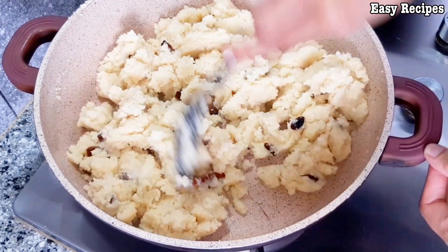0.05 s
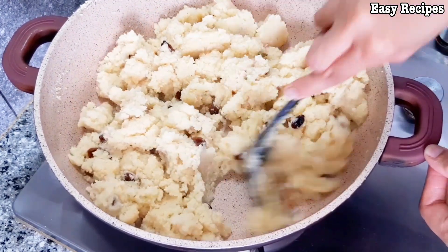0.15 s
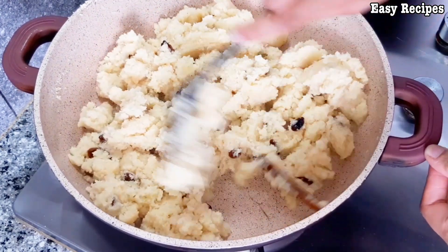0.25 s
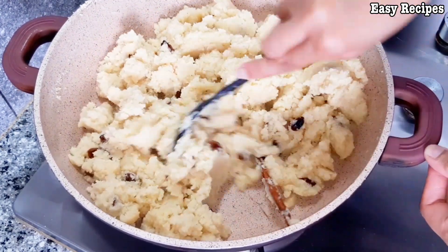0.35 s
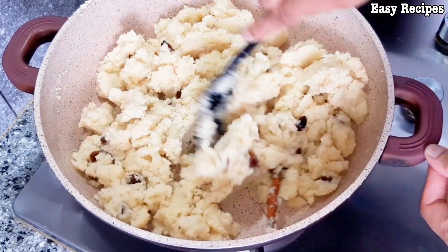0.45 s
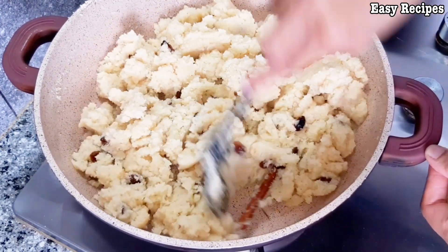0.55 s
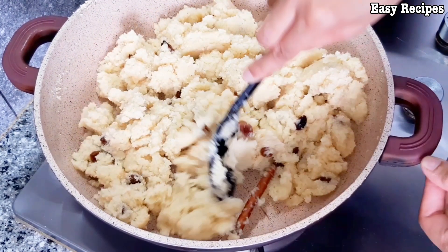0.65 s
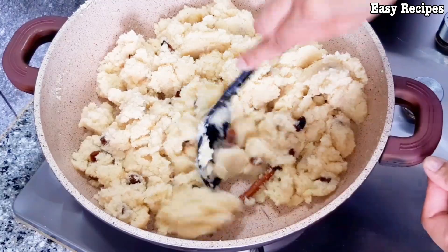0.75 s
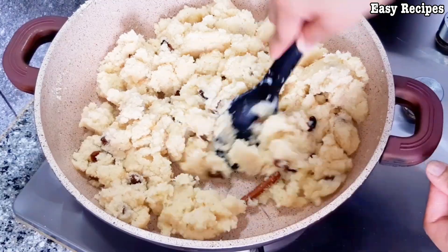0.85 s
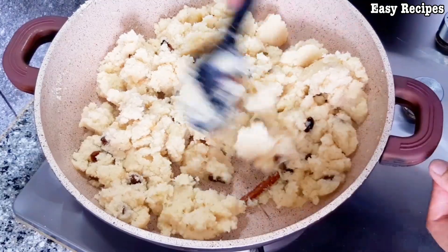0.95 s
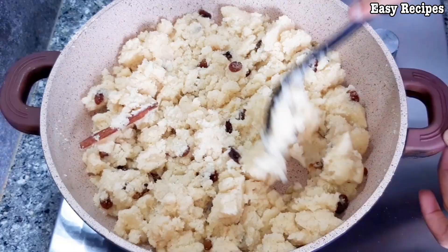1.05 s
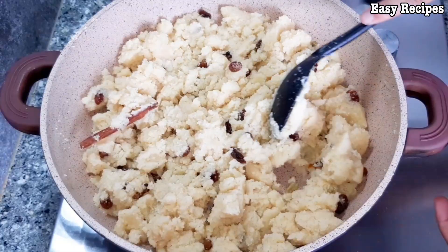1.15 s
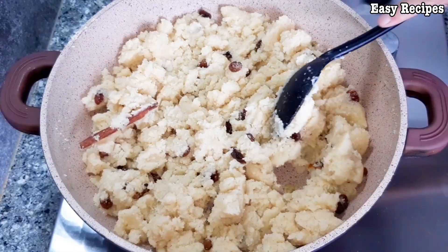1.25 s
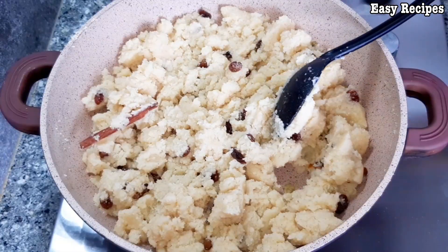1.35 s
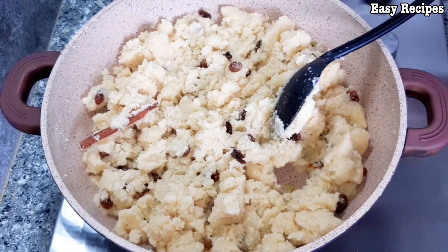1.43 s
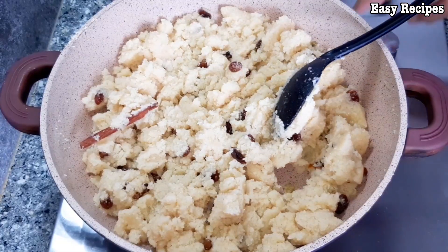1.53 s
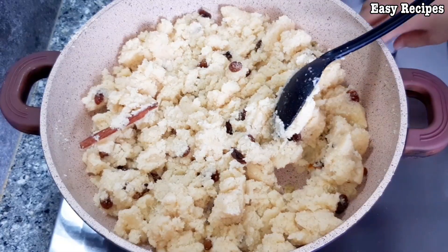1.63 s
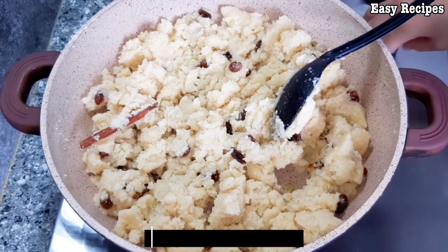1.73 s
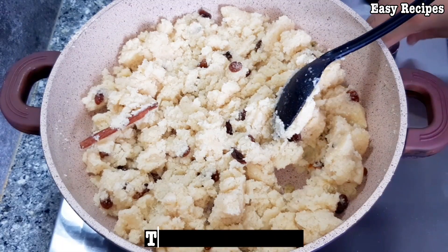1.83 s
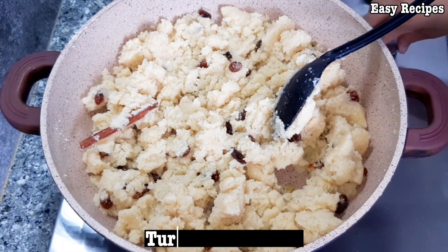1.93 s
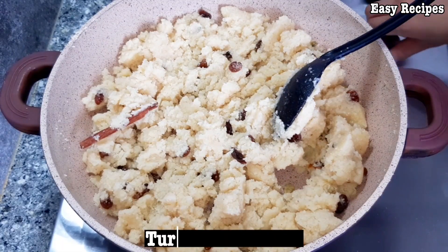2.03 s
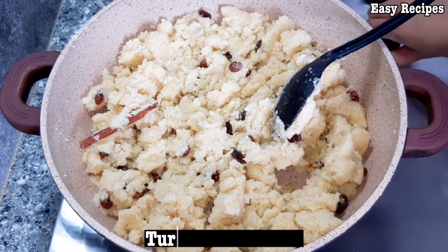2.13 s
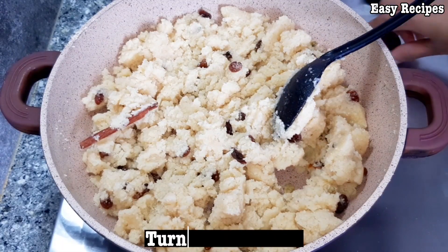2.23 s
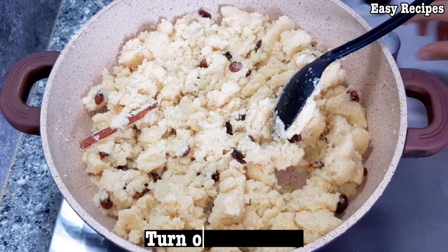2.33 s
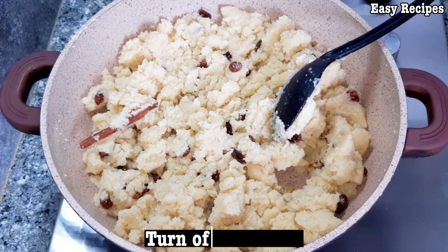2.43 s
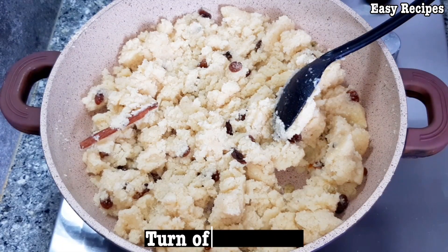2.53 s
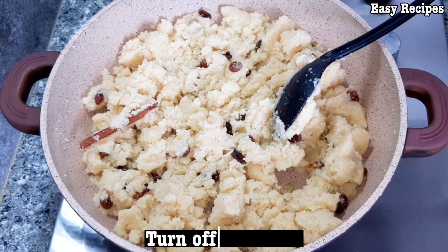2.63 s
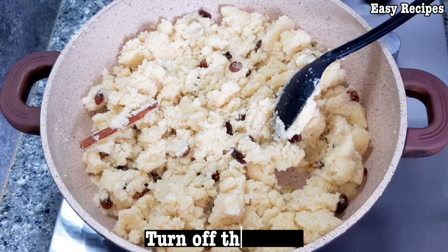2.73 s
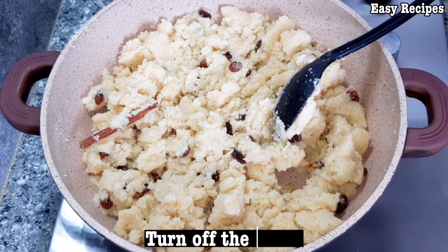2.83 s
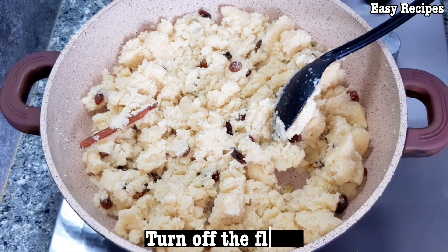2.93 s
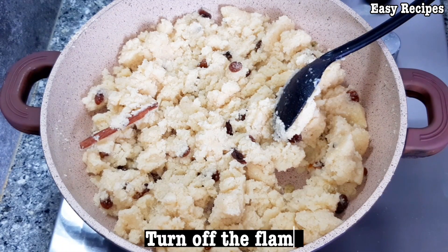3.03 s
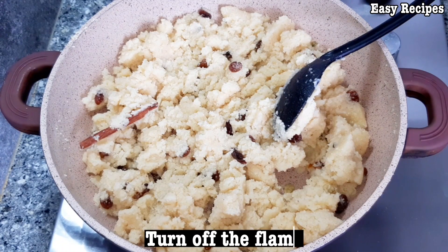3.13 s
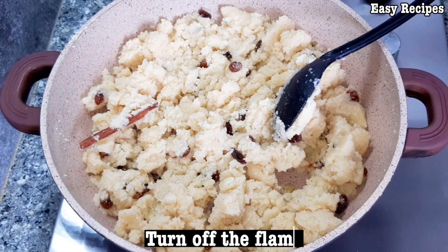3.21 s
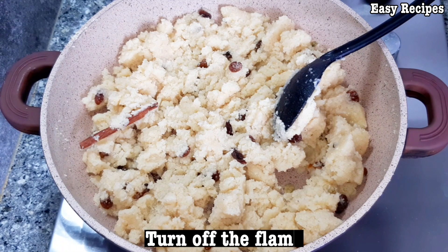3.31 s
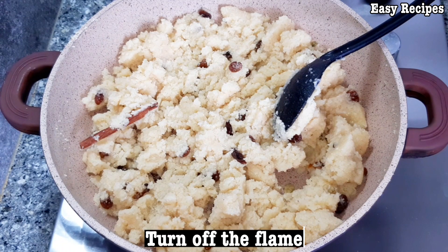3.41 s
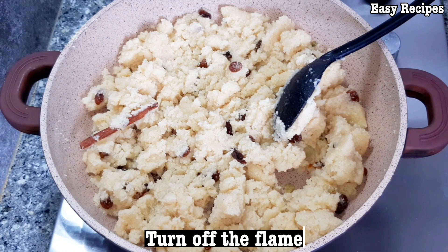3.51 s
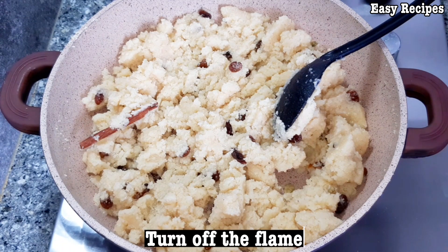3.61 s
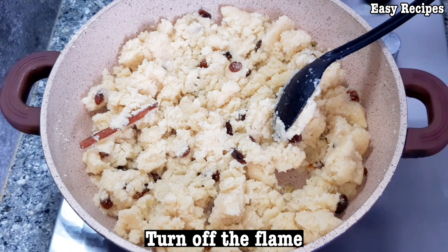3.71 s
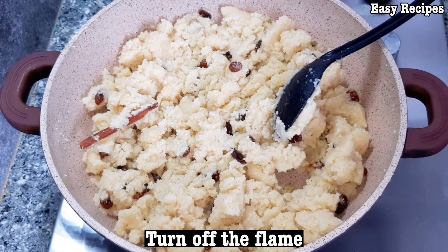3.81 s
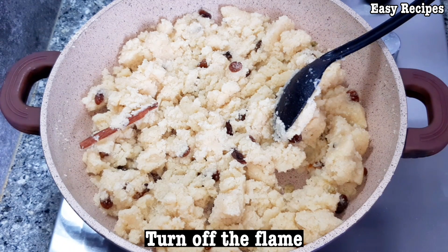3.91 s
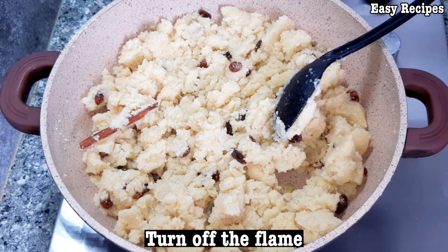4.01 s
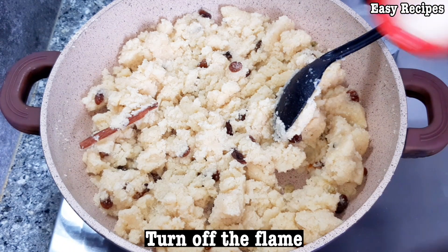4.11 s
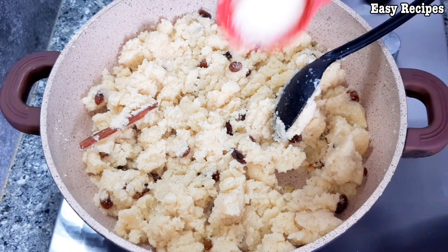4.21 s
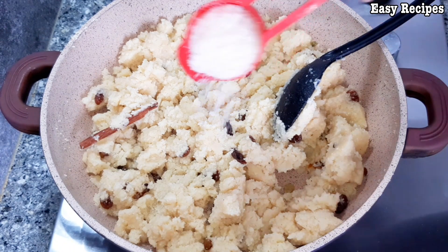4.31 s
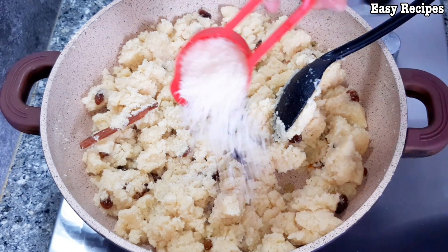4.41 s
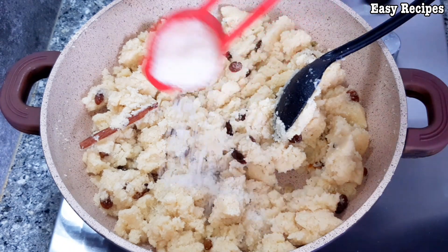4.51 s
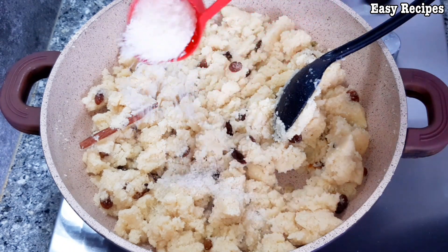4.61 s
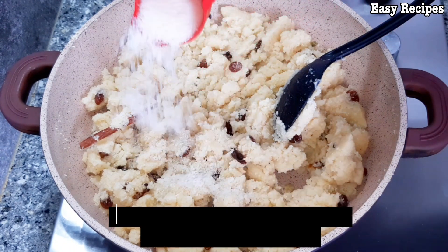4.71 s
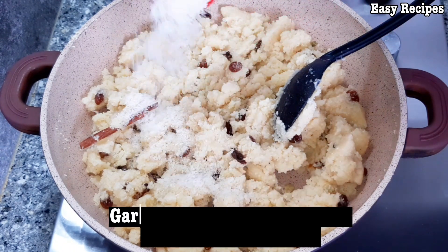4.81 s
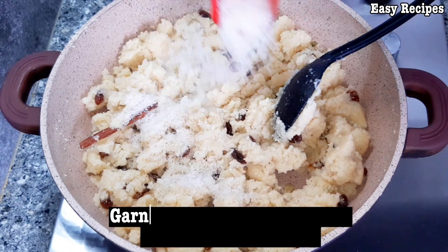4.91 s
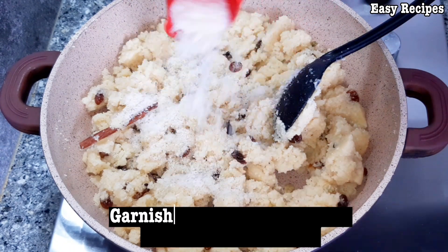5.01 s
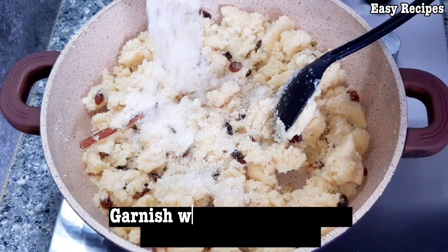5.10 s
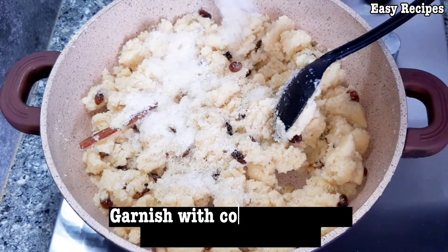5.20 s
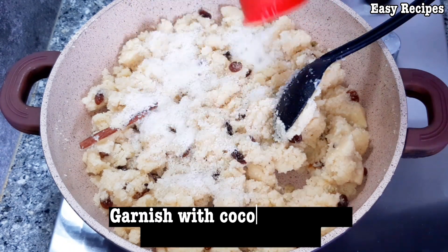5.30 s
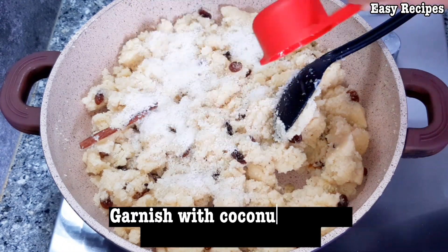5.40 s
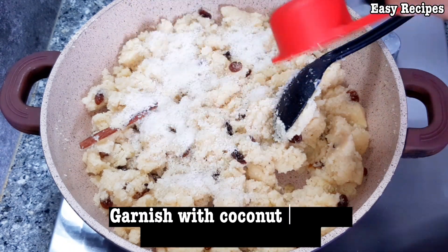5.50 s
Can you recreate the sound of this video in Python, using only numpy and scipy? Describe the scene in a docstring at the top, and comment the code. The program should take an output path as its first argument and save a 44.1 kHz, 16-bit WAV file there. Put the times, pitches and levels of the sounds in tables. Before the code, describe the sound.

In a small kitchen, close stereo microphones catch wet dough sizzling as a plastic spatula knocks and scrapes softly in a pot. After about a second the sizzle cuts off, leaving a low fluttering gas flame. A knob snaps with a double click, the flame dies with a deep thump, and faint hiss remains with tiny crackles, dull bumps and finally a rattling utensil further off.

```python
"""A plastic spatula turns thick, sizzling dough in a pot on a gas burner, knocking softly against the metal.
The loud sizzle stops abruptly, the flame flutters under the pot, the gas knob clicks and the flame goes out
with a thump. The pot crackles faintly, soft bumps follow, and a utensil clatters further off in the small kitchen.
Hisses, knocks and flame are noise filtered by colours and resonances; the flame's throb is a train of air pulses,
and its moan and the ringing gap under the pot are sines."""
import sys
import numpy as np
from scipy import signal
from scipy.fft import rfft, irfft
from scipy.io import wavfile
from scipy.ndimage import uniform_filter1d

SR = 44100
rng = np.random.default_rng(int(sys.argv[2]) if len(sys.argv) > 2 else 0)


def wrap_up_sound(samples):
    """Save the sound to the file named by the first command line argument, as 16-bit audio."""
    columns = np.atleast_2d(samples).T
    # keep every value between -1 and 1, then stretch to whole-number steps
    tamed = np.clip(columns, -1, 1)
    steps = np.round(tamed * 32767).astype(np.int16)
    wavfile.write(sys.argv[1], SR, steps)


N = 244755
TIME = np.arange(N) / SR  # s
FREQ = np.maximum(np.arange(N // 2 + 1) * SR / N, 1)  # Hz

# colour of the frying: (frequency [Hz], relative level [dB])
FRYING_COLOUR = [(200, -16), (600, -4.5), (1400, -3.5), (2500, 0.5), (6500, -1.5), (8300, -8), (12500, -2),
                 (15500, -4)]
# sweeps of the blade that make the frying surge: (start [s], length [s], level [dB])
SWEEPS = [(0, 0.13, -45.5), (0.188, 0.074, -44), (0.352, .13, -46.5), (0.658, 0.034, -44),
          (0.853, 0.2, -46.5)]
# colour of the quiet kitchen: (frequency [Hz], relative level [dB])
AIR_COLOUR = [(30, -26.5), (100, -13.5), (160, -8), (320, -1.5), (430, -8.5), (550, -1.5), (850, -2.5),
              (1250, -7.5), (2200, -5), (6500, -5), (8500, -12.5), (12500, -6), (15500, -9)]
# colour of the gas jet: (frequency [Hz], relative level [dB])
JET_COLOUR = [(300, -8.5), (1200, -0.5), (2500, 0.5), (6000, 0), (8500, -6.5), (12500, -1.5), (15500, -3.5)]
# resonances of the air gap between burner and pot:
# (frequency [Hz], width [Hz], relative level in the flame [dB], relative level ringing after the thump [dB])
AIR_GAP = [(98.4, 28, 4.5, 2.5), (202.3, 12, 1.5, -1.5), (228.2, 21, -2.5, -2), (301.5, 32, -2.5, -4.5),
           (394, 98, -16.5, -6.5), (568.5, 56, -16, -9.5), (805, 55, -29, -13.5), (980, 66, -27.5, -17.5)]
# flares and gulps of the flame: (time [s], level [dB], half length [s])
FLARES = [(1.136, -45, 0.027), (1.414, -49.5, 0.094), (1.93, -51, 0.13), (2.229, -43, 0.037),
          (2.378, -45.5, 0.021), (2.513, -49, 0.024)]
# spatula strokes: (time [s], level before gain [dB], build-up [s], brightness [Hz], relative scrape level [dB])
STROKES = [(.214, -31, 0.0088, 2000, -17), (.236, -47, 0.0033, 2500, -6), (.365, -52.5, .012, 2000, -13),
           (0.438, -37, .0069, 1800, -14), (.448, -32, 0.0024, 1190, -19), (.461, -35.5, 0.0026, 700, -34),
           (.67, -38, 0.0085, 500, -4.5), (.685, -38, .0035, 170, -22), (0.911, -53.5, 0.03, 200, -4)]
# resonances of the pot, damped by the dough: (frequency [Hz], width [Hz], relative level [dB])
POT_RESONANCES = [(115, 20, 8), (274, 78, 5), (583, 105, 4), (700, 68, -1), (804, 59, 7), (1040, 36, -32),
                  (1450, 120, -8), (1760, 90, -7), (2380, 170, -4.5), (4000, 69, -1)]
# steam blisters bursting in the dough: (time [s], level before gain [dB])
BLISTERS = [(1.1395, -51), (1.5514, -44.5), (1.7979, -49), (3.337, -50), (4.073, -50.5), (4.1562, -48),
            (5.3229, -56)]
# clicks of the gas knob snapping shut: (time [s], level before gain [dB])
KNOB_CLICKS = [(2.1473, -36.5), (2.1511, -30.5)]
# colour of the knob's snap: (frequency [Hz], relative level [dB])
KNOB_COLOUR = [(200, -32), (1200, -2.5), (2700, -1), (5000, -1.5), (5820, 8.5), (6600, -3), (8000, -7.5),
               (14000, -3), (15500, -8.5)]
# resonances of the stove housing behind the knob: (frequency [Hz], width [Hz], relative level [dB])
STOVE_HOUSING = [(320, 39, 3), (467, 45, 4.5), (554, 45, 4), (635, 45, 5), (739, 70, -8)]
# colour of the air rushing as the flame collapses: (frequency [Hz], relative level [dB])
RUSH_COLOUR = [(25, -7), (60, -6), (100, -11.5), (160, -9.5), (300, -1.5), (430, -5), (560, -3.5),
               (720, -9.5), (900, -6), (1250, -19.5), (1900, -23), (3000, -35.5), (7000, -47), (14000, -52)]
# soft bumps and shuffles around the stove: (time [s], level [dB], length [s], pitch [Hz])
BUMPS = [(3.346, -61, .025, 105.5), (4.14, -63.5, 0.063, 442), (4.446, -62.5, 0.044, 106),
         (5.266, -63, 0.089, 104.8)]
# knocks of the utensil: (start [s], level before gain [dB], ring [s], brightness [Hz])
CLATTER = [(4.773, -53.5, 0.036, 1300), (4.9644, -29.5, .012, 14000), (4.984, -39.5, 0.032, 4500),
           (5.019, -37, 0.025, 4600), (5.128, -39, 0.015, 5900), (5.153, -43, 0.025, 4000)]
# resonances of the utensil: (frequency [Hz], width [Hz], relative level [dB])
UTENSIL_RESONANCES = [(320, 290, 0.5), (586, 80, 3), (838, 230, 3.5), (1300, 690, 0.5), (1685, 280, 7),
                      (2050, 320, 1.5), (2780, 400, 6), (3230, 240, 1.5), (4560, 1400, -0.5),
                      (6100, 540, -3), (9400, 2700, -3.5), (12000, 1800, 0.5)]
# kitchen reverberation: (frequency [Hz], time to fall by 60 dB [s])
ROOM_DECAY = [(100, 0.385), (400, 0.14), (1200, 0.29), (4000, 0.2), (12000, 0.23)]
# how alike the two microphones hear: (frequency [Hz], correlation [0 to 1])
MIC_LIKENESS = [(110, 0.92), (260, 0.51), (550, 0.25), (1100, 0)]
# colour difference of the microphones: (frequency [Hz], left minus right [dB])
MIC_DIFFERENCE = [(100, 0), (380, -2.34), (1200, -2), (4400, -.5), (6500, -0.5), (8500, 10), (15000, 2)]

SIZZLE_END_S, FLAME_OUT_S = 1.085, 2.5755
FRYING_DB, SURGE_RISE_S, SURGE_FALL_S = -49.5, 0.022, 0.12  # frying between sweeps; how a surge comes and goes
AIR_DB, JET_DB = -56.5, -57  # steady hiss of the kitchen and of the gas jet
JET_EMPTY_S, JET_FADE_S = 2.68, 0.1  # the gas line has emptied; how fast its hiss then fades
# drone of the flame before its flutter: under the sizzle, after the sizzle, with the gas shut off
FLAME_EARLY_DB, FLAME_STEADY_DB, FLAME_STARVED_DB = -56, -51, -55.5
THROB_HZ, DYING_THROB_HZ = 150, 105  # before and after the collapse
STROKE_FALL_S, STROKE_LOW_HZ = 0.0082, 226  # die-away; low edge of a stroke with a brightness of 1 kHz
CLATTER_LOW_HZ, CLATTER_RISE_S = 358, 0.0043  # low edge and build-up of every utensil knock
TOP_HZ = 15650  # where the treble is cut


def undb(db):
    """Decibels to gain."""
    return 10 ** (np.asarray(db) / 20)


def unit(x):
    """Scale to rms 1."""
    return x / np.sqrt(np.mean(x ** 2))


def across(points, hz=FREQ):
    """Read (Hz, value) points on a log-frequency axis."""
    point_hz, value = np.transpose(points)
    return np.interp(np.log(hz), np.log(point_hz), value)


def shape(x, gain):
    """Filter by a gain for each frequency."""
    return irfft(rfft(x) * gain, N)


def band(low_hz, high_hz):
    """Response that falls 12 dB an octave outside two edges."""
    return 1 / np.sqrt((1 + (low_hz / FREQ) ** 4) * (1 + (FREQ / high_hz) ** 4))


def causal(points):
    """Response with the given (Hz, dB) colour that rings only after a blow."""
    cepstrum = irfft(np.log(undb(across(points))), N)
    # fold the backward half onto the forward half: minimum phase
    cepstrum[1:N // 2] *= 2
    cepstrum[N // 2:] = 0
    return np.exp(rfft(cepstrum))


def resonances(modes):
    """Response of (Hz, width, dB) resonances side by side."""
    return sum(undb(db) / (1 + 1j * (FREQ ** 2 - hz ** 2) / (FREQ * width)) for hz, width, db in modes)


def even(response):
    """Scale a response so that white noise keeps its level."""
    return response / np.sqrt(np.mean(np.abs(response) ** 2))


def pair(two):
    """Two unrelated signals as the microphones hear them: alike in the bass, apart in the treble."""
    alike = across(MIC_LIKENESS)
    mid = shape(two[0], np.sqrt((1 + alike) / 2))
    side = shape(two[1], np.sqrt((1 - alike) / 2))
    return np.array([mid + side, mid - side])


def noise():
    """Stereo white noise."""
    return pair(rng.standard_normal((2, N)))


def walk(rate):
    """Slow random wander of rms near 1, with rate new values a second, smoothed twice."""
    step = int(SR / rate)
    stairs = np.repeat(rng.standard_normal(N // step + 1), step)
    return unit(uniform_filter1d(uniform_filter1d(stairs, step), step)[:N])


def swell(s, rise, fall, hold=0):
    """Envelope that grows up to time s, may hold, and dies away."""
    before = np.maximum(s - TIME, 0)
    after = np.maximum(TIME - s - hold, 0)
    return np.exp(-before / rise - after / fall)


def kitchen(x, wet_db):
    """Add the diffuse tail of a small tiled room, each band of noise dying at its own pace."""
    t = TIME[:SR // 2]
    diffuse, tail = noise(), 0
    for k, (_, t60) in enumerate(ROOM_DECAY):
        # full gain at this point of the table, none at the others
        share = across([(hz, j == k) for j, (hz, _) in enumerate(ROOM_DECAY)])
        tail = tail + shape(diffuse, share)[:, :len(t)] * np.exp(-np.log(1000) * t / t60)
    tail = tail * (1 - np.exp(-t / .008))  # the echoes take a moment to gather
    tail = unit(tail) / np.sqrt(len(t))
    return x + undb(wet_db) * signal.fftconvolve(np.atleast_2d(x), tail, axes=1)[:, :N]


def fizz(spread_db):
    """Grainy stereo noise whose short grains vary randomly in strength."""
    size = np.repeat(undb(spread_db * rng.standard_normal(N // 20 + 1)), 20)[:N]
    return unit(noise() * size)


def smooth_hiss(level_db, colour):
    """Smooth hiss of the given colour whose level wavers a little."""
    coloured = unit(shape(fizz(spread_db=1.5), undb(across(colour))))
    return coloured * undb(level_db + .4 * walk(3.28))


def frying():
    """Wet dough hisses on the hot metal, surging with each sweep; at 1.085 s the loud hiss stops abruptly."""
    sizzle = shape(fizz(spread_db=1.5), even(causal(FRYING_COLOUR)))
    surge_power = sum((undb(db) * swell(s, SURGE_RISE_S, SURGE_FALL_S, hold=length)) ** 2
                      for s, length, db in SWEEPS)
    level = np.sqrt(undb(FRYING_DB) ** 2 + surge_power)
    stop = np.clip((SIZZLE_END_S - TIME) / 0.0076, 0, 1)
    return sizzle * level * stop


def quiet_kitchen(rumble_db=-79):
    """Faint even hiss over a low unsteady room rumble, resonant noise near 103 Hz."""
    rumble = unit(shape(noise(), resonances([(103, 45, 0)]) ** 2))
    return smooth_hiss(AIR_DB, AIR_COLOUR) + rumble * undb(rumble_db + 2.5 * walk(7.6))


def gas_jet():
    """Gas hisses through the burner until the line has emptied."""
    flow = np.exp(-np.maximum(TIME - JET_EMPTY_S, 0) / JET_FADE_S)
    return flow * smooth_hiss(JET_DB, JET_COLOUR)


def flame_strength():
    """The flame is louder after the sizzle, starves once the knob shuts, and is gone; flares ride on top."""
    steady = np.select([TIME < SIZZLE_END_S, TIME < KNOB_CLICKS[0][0], TIME < FLAME_OUT_S],
                       undb([FLAME_EARLY_DB, FLAME_STEADY_DB, FLAME_STARVED_DB]))
    steady = uniform_filter1d(steady, size=SR // 50)
    flare_power = sum((undb(db) * np.exp(-((TIME - s) / length) ** 2 / 2)) ** 2 for s, db, length in FLARES)
    return np.sqrt(steady ** 2 + flare_power)


def flame(flutter_db=1.9, moan_db=-8, moan_hz=265, wander=0.11):
    """Turbulent burning drones in the gap under the pot, with a faint moan that wanders in pitch."""
    gap = resonances([(hz, width, db) for hz, width, db, _ in AIR_GAP])
    turbulence = undb(across([(40, -8.0), (90, -2.0), (330, 2.5), (430, -3),
                              (900, -5.5), (2500, -24.0), (8000, -47)]))  # (Hz, dB)
    drone = unit(shape(noise(), gap * turbulence))
    pitch_hz = moan_hz * np.exp(wander * walk(9))
    moan = unit(np.sin(2 * np.pi * np.cumsum(pitch_hz) / SR) * walk(24.91))
    return (drone + undb(moan_db) * moan) * flame_strength() * undb(flutter_db * walk(30))


def spatula(gain_db=3.0):
    """The blade squeezes through dough and drags over the pot; more dough makes a duller, deeper knock."""
    pot, blade = resonances(POT_RESONANCES), even(resonances([(3200, 1200, 0)]))
    strokes = 0
    for s, db, rise, bright_hz, scrape_db in STROKES:
        drag = fizz(spread_db=2.2) * swell(s, rise, STROKE_FALL_S) * undb(db + gain_db)
        low_hz = STROKE_LOW_HZ * np.sqrt(bright_hz / 1000)
        dulling = 1 / (1 + 1j * FREQ / bright_hz)
        knock = even(pot * band(low_hz, 9000) * dulling)
        strokes = strokes + shape(drag, knock + undb(scrape_db) * blade)
    return kitchen(strokes, wet_db=-8.5)


def blisters(gain_db=2):
    """Now and then a blister of steam bursts in the dough: a very short tick of bright noise."""
    bursts = noise() * sum(undb(db + gain_db) * swell(s, 0.00033, .003) for s, db in BLISTERS)
    return kitchen(shape(bursts, band(2500, 19000)), wet_db=-0.5)


def knob(fall=0.0028, gain_db=3, housing_db=-1):
    """The gas knob snaps into its stop with a double click that knocks the stove housing."""
    snap = noise() * sum(undb(db + gain_db) * swell(s, 0.00017, fall) for s, db in KNOB_CLICKS)
    click = even(causal(KNOB_COLOUR))
    housing = undb(housing_db) * even(resonances(STOVE_HOUSING))
    return kitchen(shape(snap, click + housing), wet_db=-6.0)


def flame_out(throb_db=-7, rush_db=-19, ring_db=-27, ring_s=.04):
    """Starved of gas, the flame throbs ever harder, collapses, and rings the gap under the pot."""
    since = TIME - FLAME_OUT_S
    growth = np.minimum(1.7 * swell(FLAME_OUT_S - .0025, .0065, .007), 1)
    # each throb is a short suck of air as the burning gas shrinks; they slow down after the collapse
    cycles = since * np.where(since < 0, THROB_HZ, DYING_THROB_HZ)
    sucks = -np.exp(5.5 * np.cos(2 * np.pi * cycles))
    sucks = shape(sucks * growth, np.abs(resonances([(380, 260, 0)])) * band(180, 1500))
    throb = undb(throb_db) * sucks / np.abs(sucks).max()
    gust = noise() * swell(FLAME_OUT_S + 0.00067, 0.0084, 0.017)
    rush = shape(gust, even(causal(RUSH_COLOUR))) * undb(rush_db)
    # the air under the pot swings on after the collapse, longest in its lowest mode
    ring = 0
    for hz, _, _, db in AIR_GAP:
        fall = ring_s * (AIR_GAP[0][0] / hz) ** .15
        swing = np.sin(2 * np.pi * hz * since) * swell(FLAME_OUT_S + 0.013, 0.0077, fall)
        ring = ring + undb(db + ring_db) * swing
    return kitchen(throb + rush, wet_db=-10.0) + ring


def bumps():
    """Dull, faint knocks of someone moving about: resonant noise that swells and fades."""
    knocks = 0
    for s, db, length, hz in BUMPS:
        thud = unit(shape(noise(), resonances([(hz, 0.5 * hz, 0)]) ** 2))
        knocks = knocks + thud * undb(db) * swell(s, length, length)
    return knocks


def utensil(gain_db=3):
    """Short rattling knocks ring a utensil across the kitchen, with much room in them."""
    body, knocks = resonances(UTENSIL_RESONANCES), 0
    for s, db, ring, bright_hz in CLATTER:
        envelope = swell(s + CLATTER_RISE_S, CLATTER_RISE_S, ring)
        rattle = fizz(spread_db=2.2) * envelope * undb(db + gain_db)
        knocks = knocks + shape(rattle, even(body * band(CLATTER_LOW_HZ, bright_hz)))
    return kitchen(knocks, wet_db=-5.5)


def scene():
    """All sources together; the level dips briefly just after the sizzle stops."""
    dip = 1 - (1 - undb(-22)) * np.exp(-((TIME - 1.13) / .007) ** 4)
    stove = frying() + quiet_kitchen() + gas_jet() + flame() + spatula() + blisters()
    later = knob() + flame_out() + bumps() + utensil()
    return dip * (stove + later)


def record(dry):
    """The left microphone is brighter than the right; the top is cut steeply."""
    half_difference = across(MIC_DIFFERENCE) / 2
    coloured = shape(dry, undb(np.array([[1], [-1]]) * half_difference))
    return signal.sosfilt(signal.ellip(12, .1, 80, TOP_HZ, fs=SR, output="sos"), coloured)


dry = scene()
out = record(dry)
wrap_up_sound(out)
```